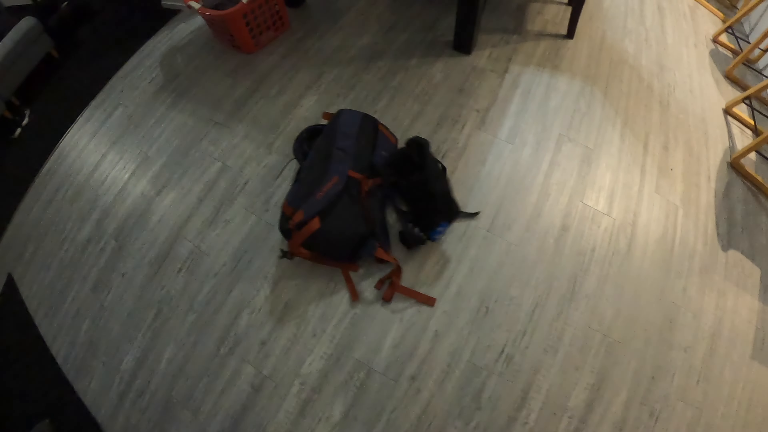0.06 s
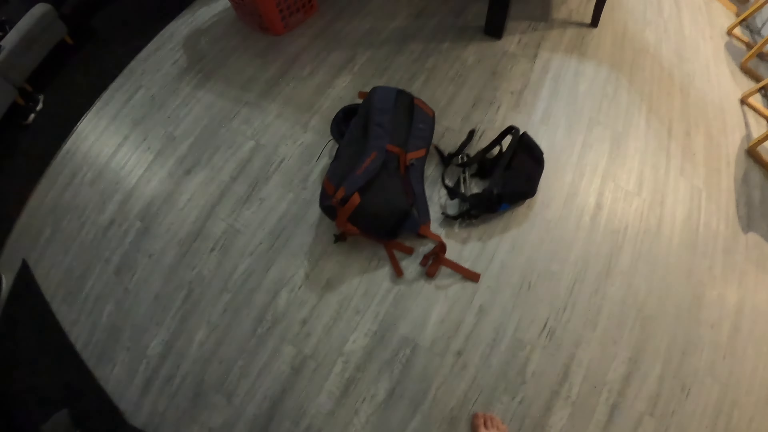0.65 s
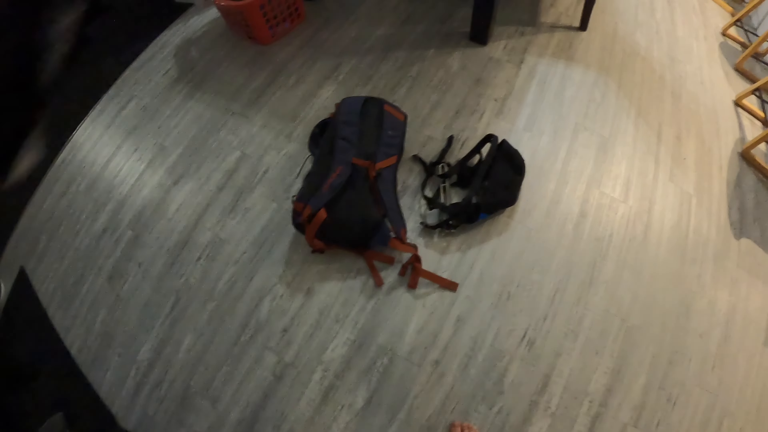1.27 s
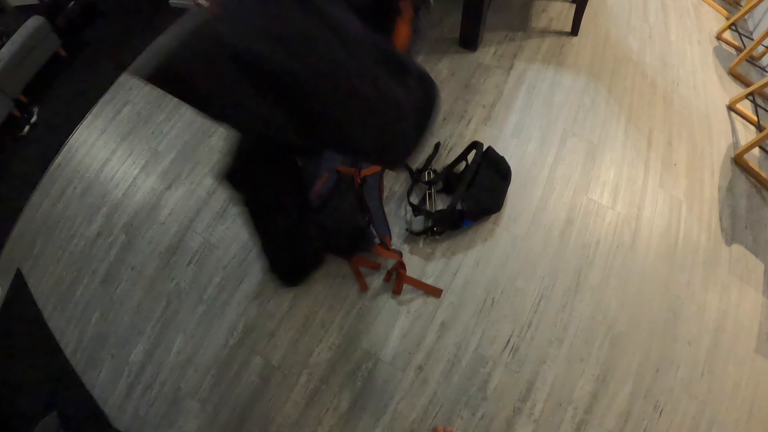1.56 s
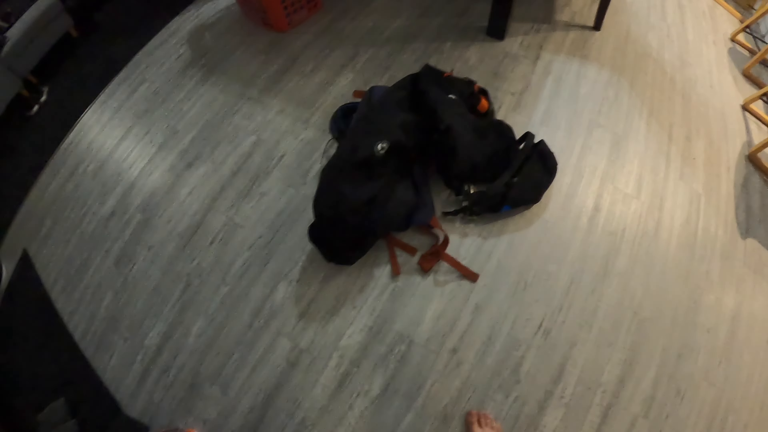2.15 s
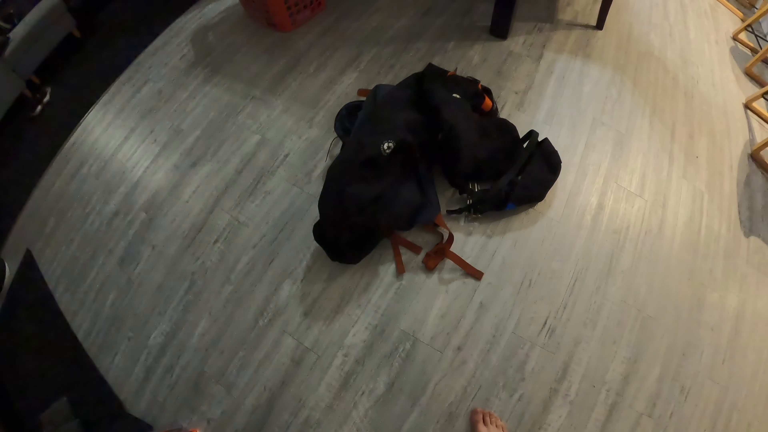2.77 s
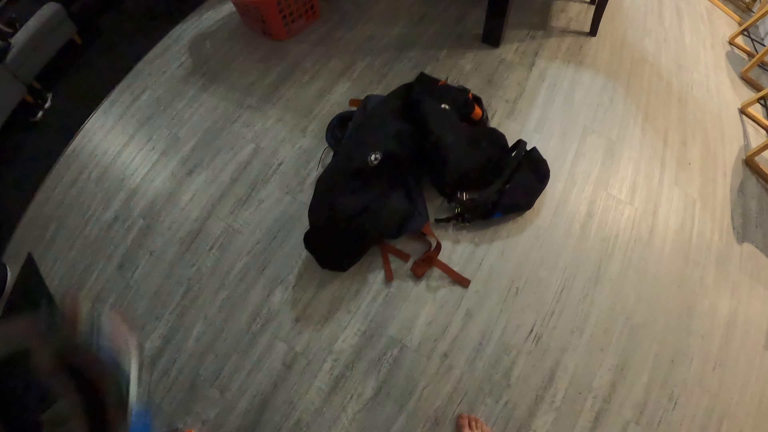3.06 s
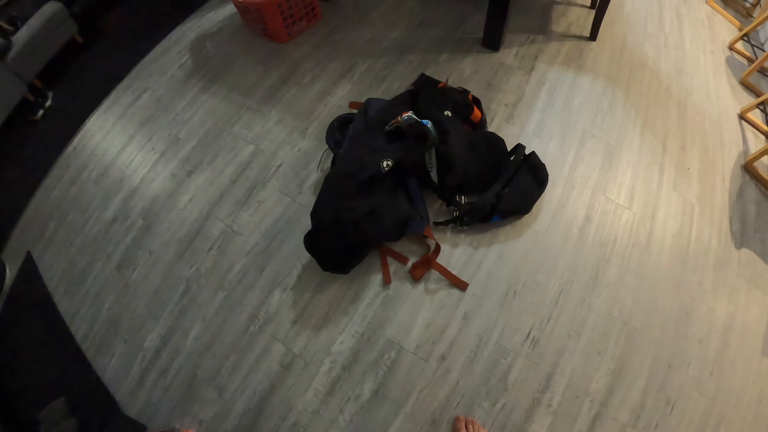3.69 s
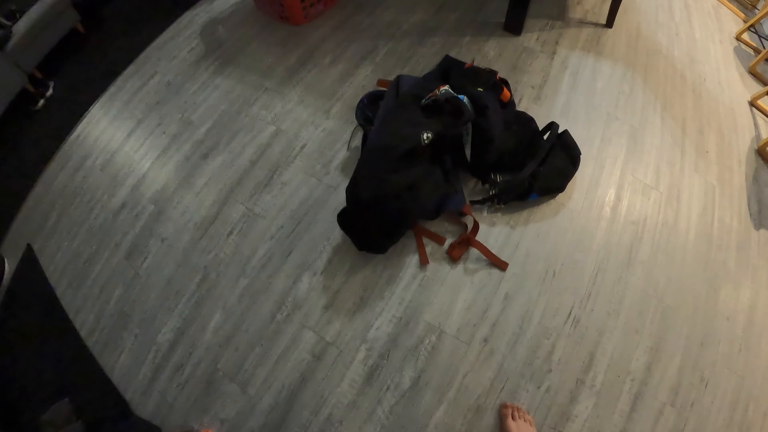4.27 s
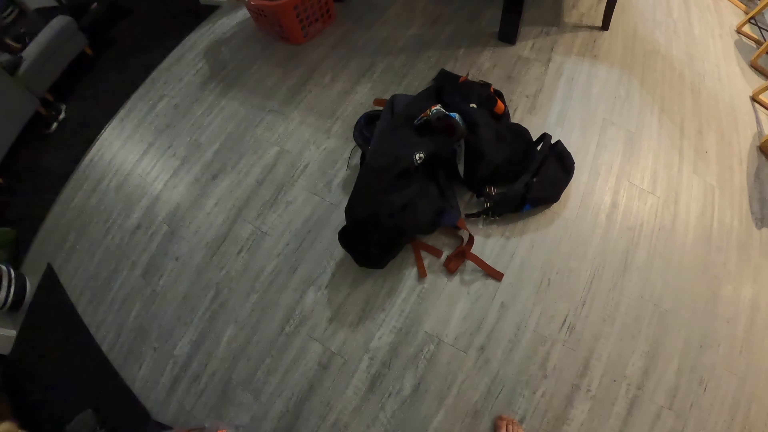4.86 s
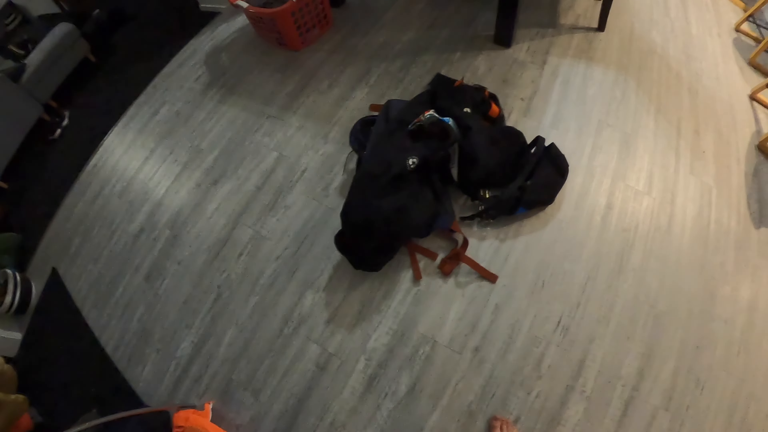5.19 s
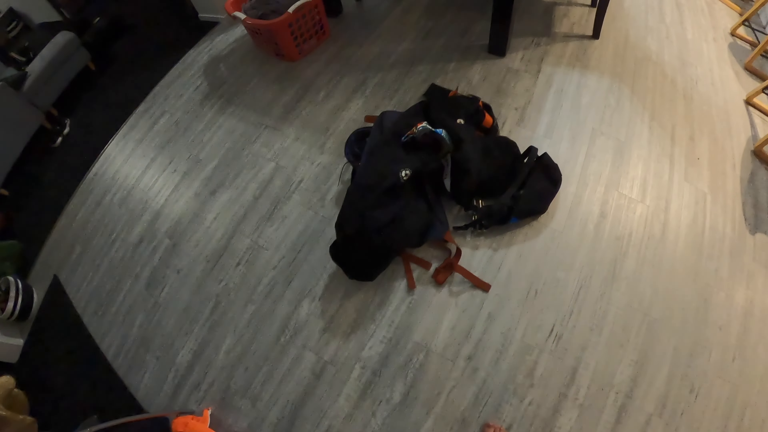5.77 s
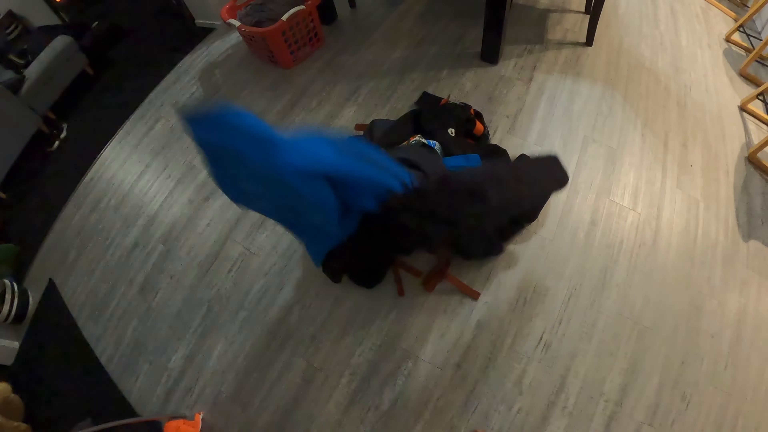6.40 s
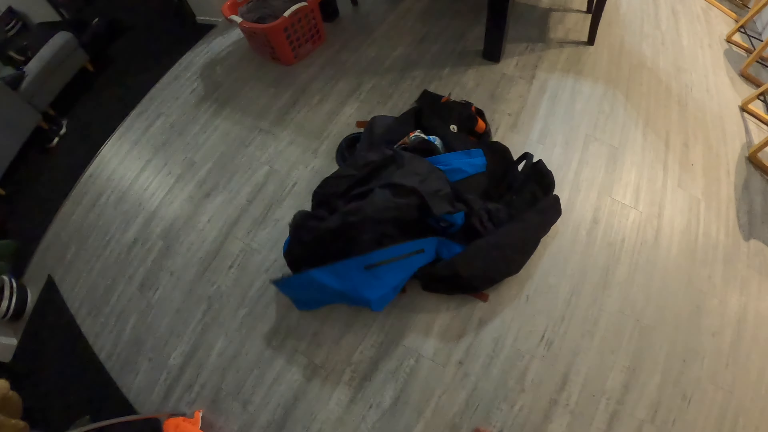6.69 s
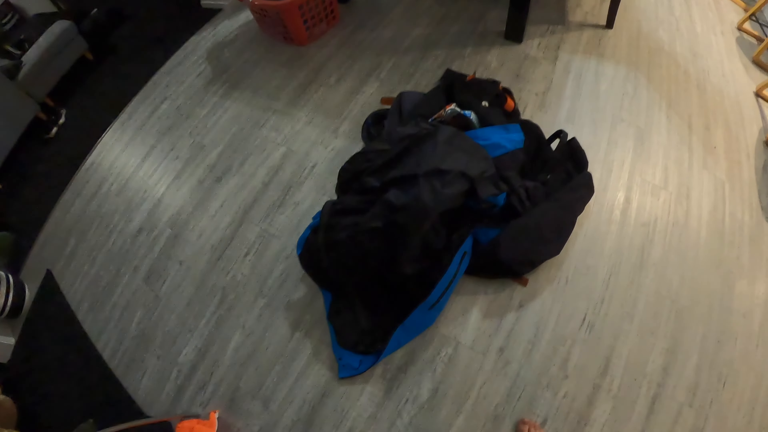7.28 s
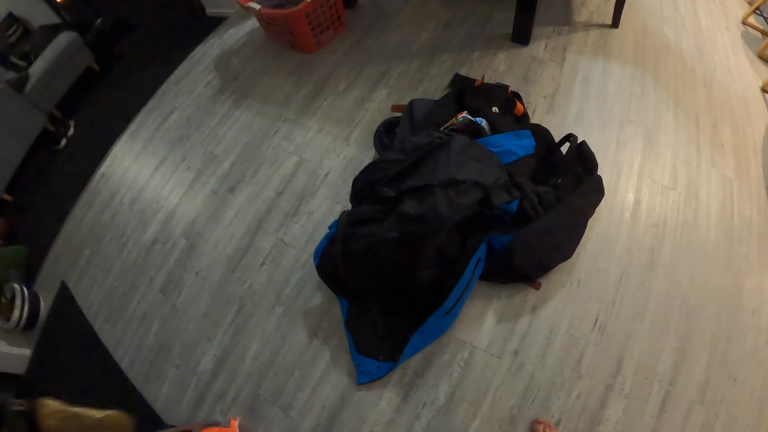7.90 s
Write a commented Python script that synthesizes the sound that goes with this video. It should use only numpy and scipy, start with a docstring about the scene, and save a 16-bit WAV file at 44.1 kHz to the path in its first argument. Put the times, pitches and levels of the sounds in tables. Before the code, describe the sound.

A bag lands with a bright metallic clatter right at the start, followed by a buckle click, light rustling and a second sharp clatter of hard gear at about 0.9 seconds. From 1.6 to 2 seconds trousers flop onto the pile with soft slaps and sharp plastic clicks. Faint nylon rustling follows, and at about 3.5 seconds goggles land with a light, hollow plastic knock. From 4.3 to 6.2 seconds nylon hisses and crumples as it is picked up, with a thin metal clink near 4.7, a latch clack near 5.1 and scattered buckle clicks. Between 6.3 and 6.7 seconds a jacket lands in a loud flurry of slaps, then settles with small ticks. A short hard clack comes at about 7.7 seconds. The bare, hard-floored room rings briefly after each impact, and moving air rumbles faintly on the body-worn microphone.

```python
"""Tossing ski gear onto a pile

A bag, trousers, goggles and a jacket land with soft slaps on the hard floor of a bare, ringing room.
Nylon hisses and crumples as each is picked up, plastic buckles click, and metal gear clinks as it is
knocked. Moving air rumbles faintly on the microphone of a body-worn camera."""
import sys
import numpy as np
from scipy import signal
from scipy.fft import rfft, irfft
from scipy.io import wavfile
from scipy.ndimage import uniform_filter1d

SR = 44100
rng = np.random.default_rng(int(sys.argv[2]) if len(sys.argv) > 2 else 0)


def transcribe(signal):
    """Save signal, clipped to [-1, 1], as a 16-bit WAV file at the path in sys.argv[1]."""
    frames = np.atleast_2d(signal).T
    limited = np.clip(frames, -1, 1)
    pcm = np.round(limited * 32767).astype(np.int16)
    wavfile.write(sys.argv[1], SR, pcm)


N = 350286

# Levels in the tables are relative: the functions set the final loudness.
# Soft gear landing. Each row: start in seconds, level in dB, length in seconds, tilt in dB per octave.
LANDINGS = [(0.0, -36.5, 0.06, -3), (0.829, -37.5, 0.023, -2.5), (0.857, -35, 0.041, 1.5),
            (0.943, -28.5, 0.019, -1), (1.6413, -32.5, 0.08, -1.1), (1.735, -28, 0.13, -1.87),
            (1.825, -24.5, 0.0098, -6.5), (3.5433, -32.5, 0.045, -1), (3.571, -34, 0.032, -3.5),
            (6.3405, -23, 0.037, 0), (6.41, -26.5, 0.12, 0.63), (6.567, -23.5, 0.054, -0.3),
            (7.62, -47, 0.0072, -2)]
# The tone of one fold hitting the pile. Each row: frequency in Hz, level in dB.
LANDING_TONE = [(25, -32), (50, -8), (197, 0), (480, -3.5), (1020, -7), (1730, -11), (7340, -21),
                (10300, -34.5), (12600, -36.5), (15500, -59.5)]

# Hard things being knocked, one table each. Each row: start in seconds, level in dB,
# length of the clatter in seconds, how much louder the ring is than the clack in dB.
POLE_HITS = [(0.0, -23.5, 0.05, -0.5), (0.048, -16.5, 0.035, -0.5), (0.078, -15.5, 0.12, -1.5)]
CARABINER_HITS = [(0.585, -45.5, 0.0082, 4.3), (0.666, -37, 0.0017, 16)]
SHAFT_HITS = [(0.862, -17.5, 0.018, -4.5), (0.897, -11.5, .03, -6.5), (0.945, -20.5, 0.0084, 19)]
GOGGLE_HITS = [(3.572, -31.5, 0.032, 23)]  # the hollow plastic frame knocks as it settles
RING_HITS = [(4.744, -34.5, 0.008, 5), (4.768, -35, 0.038, 18)]
LATCH_HITS = [(5.099, -27, 0.0069, 5)]  # a plastic latch clacks shut on a hollow shell
HOOK_HITS = [(7.736, -24.5, 0.015, -3.5), (7.925, -34, 0.0016, -3.5)]
# The notes each thing rings with. Each row: pitch in Hz, level in dB.
POLE_NOTES = [(2428, -6), (2560, -8), (4420, 0.5), (5250, -3.5), (5986, 3.5), (6207, -4.5), (7472, 0),
              (8317, 2), (8759, 2), (11680, 6.5), (12274, 4)]
CARABINER_NOTES = [(2425, -5), (3225, -4.5), (4390, 2), (5000, -3.5), (5330, -0.5), (6223, -9)]
SHAFT_NOTES = [(2450, -4), (3122, -1.5), (4410, 0.5), (7170, -2), (7257, 1), (12400, 1)]
GOGGLE_NOTES = [(520, 6), (660, 5), (1020, 8), (1250, -7)]
RING_NOTES = [(7101, 7), (7418, 10), (8210, 5), (8995, 5), (9528, 1), (11560, -1)]
LATCH_NOTES = [(990, -1), (3950, 3), (5039, -6), (7564, -12)]
HOOK_NOTES = [(3015, -4), (4985, -1), (6395, 8), (7800, 2)]
# The tone of one dry, hard knock. Each row: frequency in Hz, level in dB.
CLACK_TONE = [(200, 4.5), (1200, -7), (2700, 0), (6000, -5.5), (9000, -10.5), (10800, -11), (12300, -10.5),
              (15500, -21.5)]

# Air moving over the microphone. Each row: time in seconds, level in dB.
DRAUGHT = [(0.0, -50.5), (3.5, -50), (4.3, -42), (5.3, -38.5), (5.9, -46.5), (7.0, -48.5), (7.9, -44)]
# The tones of that air and of the room's steady hush. Each row: frequency in Hz, level in dB.
RUMBLE_TONE = [(3, -20), (9, -2.5), (30, -20.5), (55, -31.5), (90, -57.5), (300, -73.5)]
HUSH_TONE = [(30, -26), (90, -16.5), (190, 2), (400, -11.5), (1000, -25), (2000, -26), (5000, -30.5),
             (16000, -54.5)]

# Plastic buckles and stiff folds snapping. Each row: start in seconds, peak level in dB, pitch in Hz.
CLICKS = [(0.217, -18, 8200), (0.308, -33, 4040), (0.4736, -38, 1390), (1.6816, -19, 2900),
          (1.8683, -10, 2580), (1.8694, -14, 4300), (1.885, -19, 2580), (1.977, -22, 3860),
          (4.129, -40, 3180), (4.222, -40.5, 1410), (4.696, -30, 1440), (4.876, -26.5, 3140),
          (5.5255, -23.5, 1520), (5.5373, -21, 3700), (5.839, -42, 2230), (5.919, -32.5, 1390),
          (6.416, -15, 4580), (6.833, -34.5, 2020), (6.922, -40, 2400), (7.028, -35, 2040),
          (7.1106, -33, 1830)]

# Nylon being pulled, lifted or left to settle.
# Each row: start in seconds, length in seconds, hiss level in dB, crumpling level in dB.
PULLS = [(0.535, 0.51, -55, -47.5), (0.903, 0.17, -46, -41.5), (1.14, 0.53, -63, -60),
         (1.406, 0.062, -56, -67), (2.394, 0.22, -55, -62.5), (2.592, 0.17, -48.5, -59),
         (3.132, 0.13, -70, -79), (4.103, 0.22, -61.5, -65.5), (4.318, 0.35, -40.5, -42),
         (4.524, 0.41, -39.5, -34), (4.887, 0.4, -44.5, -40.5), (5.227, 0.28, -40, -38),
         (5.424, 0.34, -52, -52), (5.79, 0.21, -53, -51.5), (5.99, 0.13, -50.5, -50.5),
         (6.107, 0.14, -46.5, -46), (6.22, 0.13, -65, -51), (6.77, 0.4, -55, -66),
         (6.99, 0.12, -53.5, -51.5), (7.467, 0.21, -54, -82)]
# The tones of nylon's hiss, dull pops and crisp crinkles. Each row: frequency in Hz, level in dB.
HISS_TONE = [(600, -23), (1400, 7.5), (2800, 6.5), (7500, 2.5), (10500, -11), (12500, -4), (15500, -29.5)]
CRUMPLE_TONE = [(40, -0.5), (190, 3.5), (650, -0.5), (1050, -0.5), (1800, -10.5), (14000, -55)]
CRINKLE_TONE = [(400, -22.5), (1200, -1), (2400, -5), (5000, -5.5), (14000, -44.5)]

# Stiff cloth or padding hitting flat. Each row: start in seconds, peak level in dB, pitch in Hz.
SLAPS = [(1.7336, -14, 860), (1.749, -17, 483), (1.858, -18, 666), (3.5456, -31, 452), (6.343, -14, 805),
         (6.451, -13, 1000), (6.5234, -8.5, 1030), (6.574, -14.5, 1070), (6.611, -14, 774)]
# Folds or pads rubbing past each other.
# Each row: start in seconds, level in dB, length in seconds, pitch in Hz.
SCUFFS = [(2.494, -48, 0.026, 200), (2.567, -54, 0.033, 316), (2.654, -51.5, 0.032, 325),
          (4.355, -44, 0.012, 1460), (4.521, -36.5, 0.011, 1390), (4.595, -37, 0.049, 1620),
          (4.675, -30, 0.019, 1070), (4.805, -29.5, 0.023, 940), (5.317, -33, 0.0064, 1290),
          (5.332, -35, 0.016, 1180), (5.441, -37, 0.013, 1910), (5.474, -39.5, 0.012, 2480),
          (6.049, -46, 0.029, 1020), (7.382, -57.5, 0.09, 1232)]

# How long the room rings. Each row: frequency in Hz, seconds to fade by 60 dB (called t60 below).
ROOM_T60 = [(100, 0.71), (700, 0.69), (1840, 0.8), (8000, 0.69), (13000, 0.48)]
# How wide the echo is. Each row: frequency in Hz, level of the left-minus-right part in dB.
ROOM_WIDTH = [(100, -29), (300, -20), (700, -13), (1500, -8), (5000, -10), (9000, -8), (13000, 0)]
# The microphone's two openings. Each row: frequency in Hz, how much louder the left is in dB.
LEFT_BOOST = [(200, 0), (1500, 2), (10500, 0), (11700, 6.5), (13000, 11)]
# Their timing. Each row: frequency in Hz, how far the left wave is ahead in radians.
LEFT_LEAD = [(11400, 0), (13200, -2.2)]

CATCH_DB, CATCH_S = 2, 0.008  # sliding weave catches and slips: how much and how fast its level wavers


def amp(db):
    """Turns decibels into a number to multiply a sound by."""
    return 10 ** (np.asarray(db) / 20)


def evened(x):
    """Scales a sound so its average power is one."""
    return x / np.sqrt(np.mean(x ** 2) + 1e-20)


def unit(x):
    """Scales a sound so its total energy is one."""
    return x / np.sqrt(np.sum(x ** 2) + 1e-20)


def read(points, hz):
    """Looks up a frequency in a table, sliding between rows on a scale of octaves."""
    f, value = np.transpose(points)
    return np.interp(np.log(hz + 1), np.log(f + 1), value)


def add(mix, start, sound):
    """Mixes a sound in at a start time in seconds."""
    part = mix[max(round(start * SR), 0):][:len(sound)]
    part += sound[:len(part)]


def shaped(x, gain_at):
    """Turns each frequency up or down by the amount gain_at gives for it."""
    return irfft(rfft(x) * gain_at(np.fft.rfftfreq(x.shape[-1], 1 / SR)), x.shape[-1])


def snap(tone, tilt_db=0, size=2048):
    """The shortest sudden pulse with this tone; tilt_db brightens it by that much per octave."""
    hz = abs(np.fft.fftfreq(size, 1 / SR))
    log_gain = np.log(amp(read(tone, hz) + tilt_db * np.log2(np.maximum(hz, 70))))
    spectrum = np.exp(np.conj(signal.hilbert(log_gain)))  # packs the energy at the start
    return unit(np.fft.ifft(spectrum).real)


def grains(n, per_s, spread_db):
    """Tiny ticks at random times, mostly small and a few large."""
    chance, size, sign = rng.random((3, n))
    strength = amp(spread_db * np.minimum(-np.log(1 - size), 4))
    return evened((chance < per_s / SR) * np.sign(sign - .5) * strength)


def wander(shape, seconds):
    """A random drift that changes over the given time, without extreme swings."""
    drift = uniform_filter1d(rng.standard_normal(shape), int(seconds * SR))
    return np.clip(evened(drift), -1.5, 1.5)


def arch(length):
    """The speed of one hand movement, from rest to rest."""
    return np.sin(np.linspace(0, np.pi, int(length * SR)))


def contact(chatter_db, t60, size=8192):
    """A hard touch and its dying chatter, with no tone of its own."""
    t = np.arange(size // 4) / SR
    touch = amp(chatter_db - 60 * t / t60) * rng.standard_normal(len(t))
    touch[0] = 1
    spectrum = np.fft.fft(touch, size)
    tone = np.exp(np.conj(signal.hilbert(np.log(abs(spectrum) + 1e-12))))
    return np.fft.ifft(spectrum / tone).real[:len(t)]  # dividing makes all frequencies equally strong


def landings(per_s=6000, spread_db=3, sag_db=3, onset_db=-1, onset_s=0.0074):
    """Soft gear lands in a quick shower of taps as one fold after another meets the pile."""
    out = np.zeros(N)
    for start, db, length, tilt_db in LANDINGS:
        n = int(max(length, .004) * SR)
        t = np.arange(n) / SR
        catching_db = CATCH_DB * wander(SR // 4, CATCH_S)[:n]
        force = amp(onset_db * np.exp(-t / onset_s) - sag_db * t / length + catching_db)
        shower = evened(grains(SR // 4, per_s, spread_db)[:n] * force)
        add(out, start, amp(db) * signal.fftconvolve(shower, snap(LANDING_TONE, tilt_db)))
    return out


def hard_gear(hits, notes, t60, level_db, linger_db=-70, linger_t60=0.35, jitter_hz=30):
    """A clatter of hard knocks gives a dry clack and sets a thing ringing; high notes die first."""
    out, t = np.zeros(N), np.arange(SR // 2) / SR
    hz, note_db = np.transpose(notes)[:, :, None]
    height = np.sqrt(hz / hz.mean())  # scales the fading and jitter: 1 at the average pitch
    age = t * height
    linger = amp(linger_db - 60 * age / linger_t60)  # faint ring once the clatter stops damping it
    fade = amp(note_db) * (amp(-60 * age / t60) + linger)
    for start, db, length, ring_db in hits:
        n = int(max(length, .002) * SR)
        clatter = unit(grains(SR // 8, per_s=6000, spread_db=2)[:n] * np.linspace(1, .3, n))
        clack = np.pad(signal.fftconvolve(clatter, snap(CLACK_TONE)), (0, len(t)))[:len(t)]
        # Pieces that keep touching pull each other's notes about, which roughens them.
        rough_hz = hz + jitter_hz * height * wander(age.shape, seconds=0.002)
        cycles = np.cumsum(rough_hz, axis=1) / SR + rng.random(hz.shape)
        ring = np.sum(fade * np.sin(2 * np.pi * cycles), axis=0)
        ring = unit(ring * np.minimum(t * SR / n, 1))  # builds up over the clatter
        add(out, start, amp(db + level_db) * unit(clack + amp(ring_db) * ring))
    return out


def air(left_db=-2, right_db=3.0, hush_db=-71, width=0.23):
    """Air buffets the moving microphone with a deep rumble, over the room's faint steady hush."""
    noise = rng.standard_normal(N) + width * rng.standard_normal((2, N))
    rumble = evened(shaped(noise, lambda f: amp(read(RUMBLE_TONE, f)))) * amp([[left_db], [right_db]])
    hush = evened(shaped(noise[:, ::-1], lambda f: amp(read(HUSH_TONE, f))))
    draught = amp(np.interp(np.arange(N) / SR, *np.transpose(DRAUGHT)))
    return rumble * draught + amp(hush_db) * hush


def buckles(level_db=6, chatter_db=-19, chatter_t60=0.027, body_db=-7, body_cycles=11):
    """A hard touch and a brief chatter make a small piece of plastic tick and ring for a moment."""
    out, t = np.zeros(N), np.arange(SR // 20) / SR
    for start, db, hz in CLICKS:
        body = unit(amp(-60 * t * hz / body_cycles) * np.cos(2 * np.pi * hz * t))
        tone = [(hz / 8, -28), (hz / 2, -9), (hz, 0), (hz * 2, -8), (hz * 3.5, -23), (hz * 10, -52)]
        tick = snap(tone, size=len(t))
        click = signal.fftconvolve(contact(chatter_db, chatter_t60), tick + amp(body_db) * body)
        add(out, start, amp(db + level_db) * click / abs(click).max())
    return signal.lfilter(*signal.butter(3, 8000, fs=SR), out)  # plastic is too soft for the top octave


def nylon(hiss_db=-1.5, crinkle_db=-7, clump_db=3, clump_s=0.02):
    """Sliding weave gives an uneven hiss; collapsing folds give dull pops and crisp crinkles."""
    slide, fold = np.zeros((2, N))
    for start, length, slide_db, fold_db in PULLS:
        add(slide, start, amp(slide_db) * arch(length))
        add(fold, start, amp(fold_db) * arch(length))
    fold *= amp(clump_db * wander(N, clump_s))  # cloth catches and lets go, so folds give way in clumps
    slide *= amp(CATCH_DB * wander(N, CATCH_S))
    hiss = signal.oaconvolve(slide * grains(N, per_s=16000, spread_db=7.0), snap(HISS_TONE))
    pops = signal.oaconvolve(fold * grains(N, per_s=900, spread_db=3.5), snap(CRUMPLE_TONE))
    crinkles = signal.oaconvolve(fold * grains(N, per_s=130, spread_db=2.5), snap(CRINKLE_TONE))
    return (amp(hiss_db) * hiss + pops + amp(crinkle_db) * crinkles)[:N]


def slaps(level_db=3, flutter_db=-18, flutter_t60=0.044):
    """A cloth panel hits flat and flutters; the air squeezed from under it gives a hollow pop."""
    out = np.zeros(N)
    for start, db, hz in SLAPS:
        tone = [(hz / 8, -16), (hz / 2, -8), (hz, 0), (hz * 1.7, -11), (hz * 5, -23), (hz * 16, -52)]
        pop = signal.fftconvolve(contact(flutter_db, flutter_t60), snap(tone))
        add(out, start, amp(db + level_db) * pop / abs(pop).max())
    return out


def scuffs(per_s=3000, spread_db=3, sharpness=0.91):
    """A quick run of tiny slips swells and dies, taking on the vague pitch of one fold."""
    out = np.zeros(N)
    for start, db, length, hz in SCUFFS:
        speed = arch(length)
        slips = grains(SR, per_s, spread_db)[:len(speed)] * speed
        fold = signal.iirpeak(hz, sharpness, fs=SR)
        scuff = signal.lfilter(*fold, signal.lfilter(*fold, slips))
        add(out, start, amp(db) * evened(scuff))
    return out


def reflections(early_db):
    """The room's answer to one click: ten floor and wall echoes over a smooth, fading tail."""
    fade_in = np.minimum(np.arange(SR) / SR / 0.0045, 1)
    bounces = rng.choice([-1., 1.], (2, SR)) * (rng.random((2, SR)) < 5000 / SR) * fade_in
    hz, t, spectrum = signal.stft(bounces, SR, nperseg=256)
    fade_out = amp(-60 * t / read(ROOM_T60, hz)[:, None])
    tail = signal.istft(spectrum * fade_out, SR, nperseg=256)[1][:, :SR]
    middle = unit(tail[0])  # the part left and right share
    side = shaped(unit(tail[1]), lambda f: amp(read(ROOM_WIDTH, f)))
    delays = (rng.uniform(.002, .022, size=10) * SR).astype(int)
    middle[delays] += amp(early_db) * unit(rng.choice([-1., 1.], size=10))
    return np.array([middle + side, middle - side]) / np.linalg.norm(middle)


def room(x, direct_db, early_db, shift_hz=20, places=3):
    """Moving things reach the walls from shifting places, so the echo pattern keeps changing."""
    out = amp(direct_db) * np.array([x, x])
    for place in range(places):
        share = np.sqrt(2 / places) * np.cos(np.pi * (shift_hz * np.arange(N) / SR + place / places))
        out += signal.fftconvolve((x * share)[None], reflections(early_db), axes=1)[:, :N]
    return out / np.hypot(1, amp(direct_db))


def scene():
    """Cloth, buckles and hard gear all sound in the same bare room, over the moving air."""
    clinks = (hard_gear(POLE_HITS, POLE_NOTES, t60=0.076, level_db=17, linger_db=-24, jitter_hz=95)
              + hard_gear(SHAFT_HITS, SHAFT_NOTES, t60=0.055, level_db=16, linger_db=-8, jitter_hz=100)
              + hard_gear(RING_HITS, RING_NOTES, t60=0.075, level_db=29, linger_db=-2)
              + hard_gear(HOOK_HITS, HOOK_NOTES, t60=0.02, level_db=11.5)
              + hard_gear(CARABINER_HITS, CARABINER_NOTES, t60=0.11, level_db=23, jitter_hz=110)
              + hard_gear(GOGGLE_HITS, GOGGLE_NOTES, t60=0.037, level_db=26.5)
              + hard_gear(LATCH_HITS, LATCH_NOTES, t60=0.029, level_db=25, jitter_hz=80))
    return (room(landings(), direct_db=-1.0, early_db=-4.5)
            + room(nylon(), direct_db=-1.5, early_db=-6.0)
            + room(buckles() + slaps() + scuffs(), direct_db=4, early_db=-2.5)
            + room(clinks, direct_db=5.0, early_db=-0.5)
            + air())


def record(dry, cutoff_hz=15800):
    """The microphone's two openings hear high sounds unequally, and the very highest are cut off."""
    half = np.array([[.5], [-.5]])  # the left gains half and the right loses half
    heard = shaped(dry, lambda f: amp(half * read(LEFT_BOOST, f)) * np.exp(1j * half * read(LEFT_LEAD, f)))
    treble_cut = signal.firwin(511, cutoff_hz, window=("kaiser", 9), fs=SR)
    return signal.oaconvolve(heard, treble_cut[None], "same")


dry = scene()
out = record(dry)
transcribe(out)
```